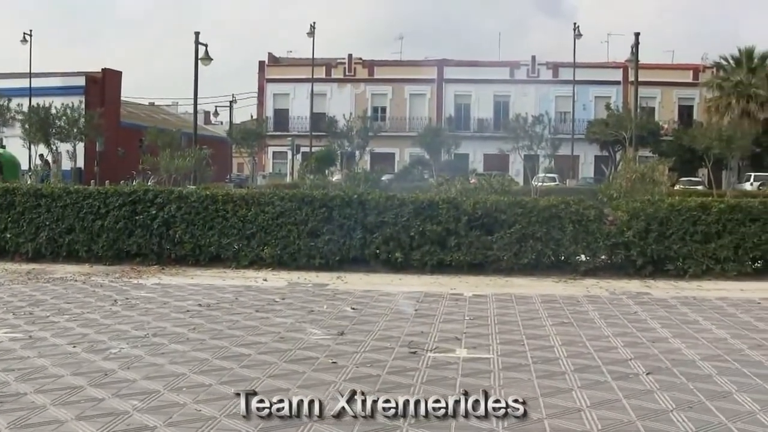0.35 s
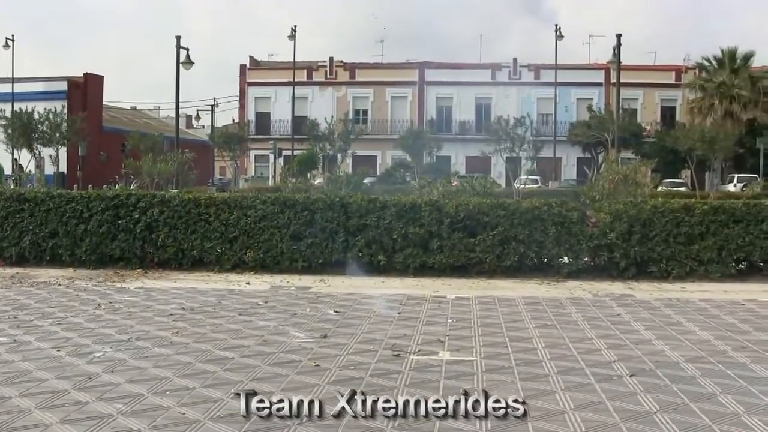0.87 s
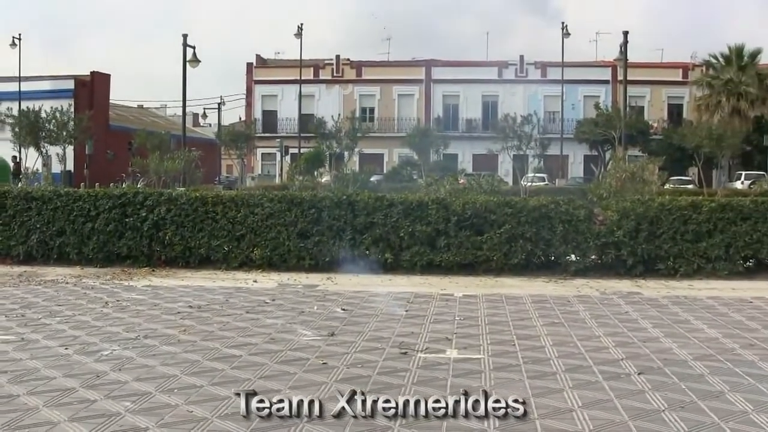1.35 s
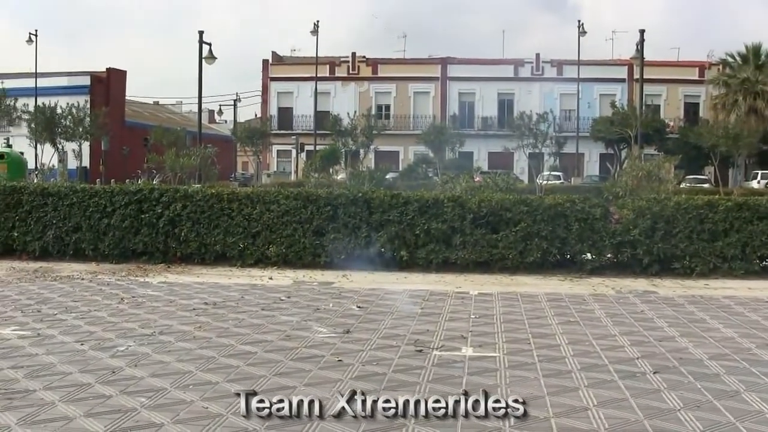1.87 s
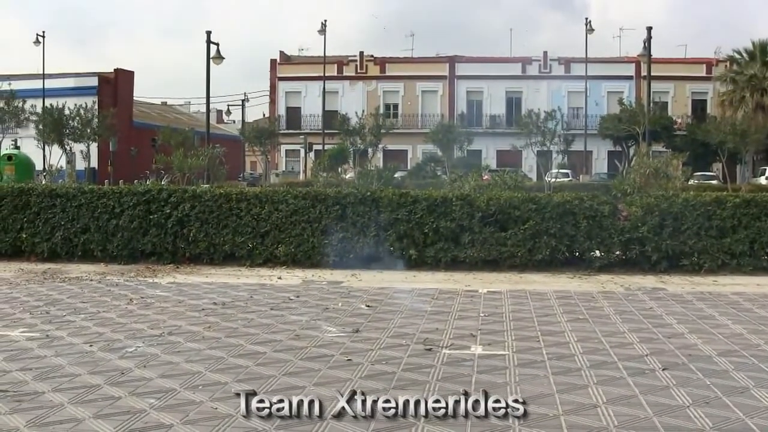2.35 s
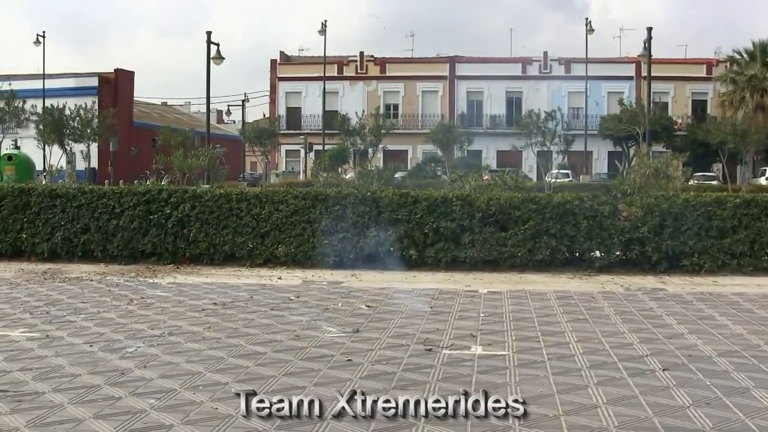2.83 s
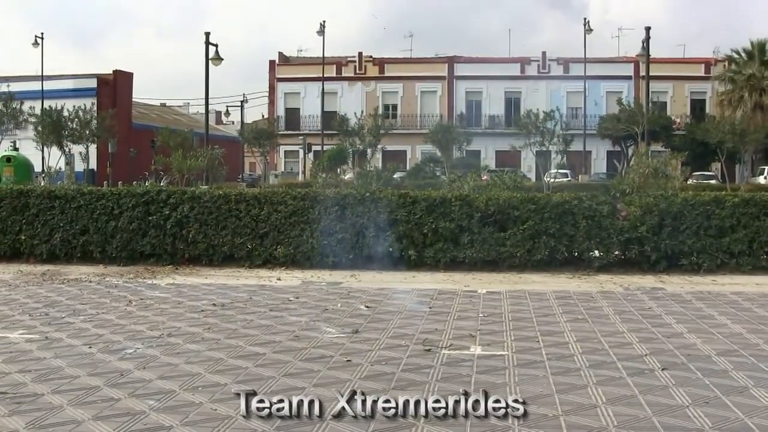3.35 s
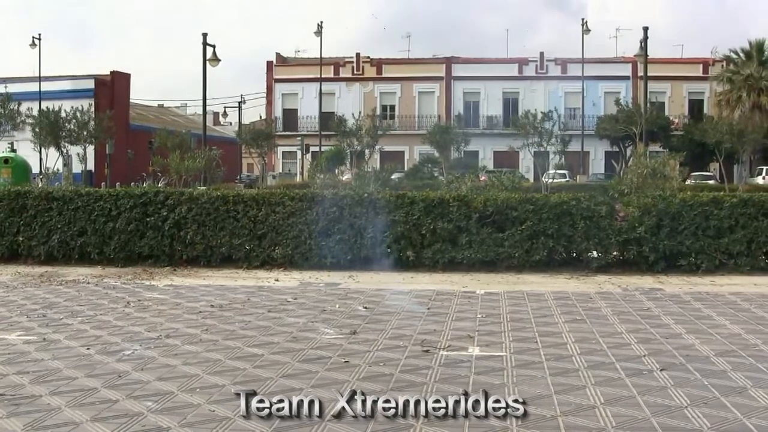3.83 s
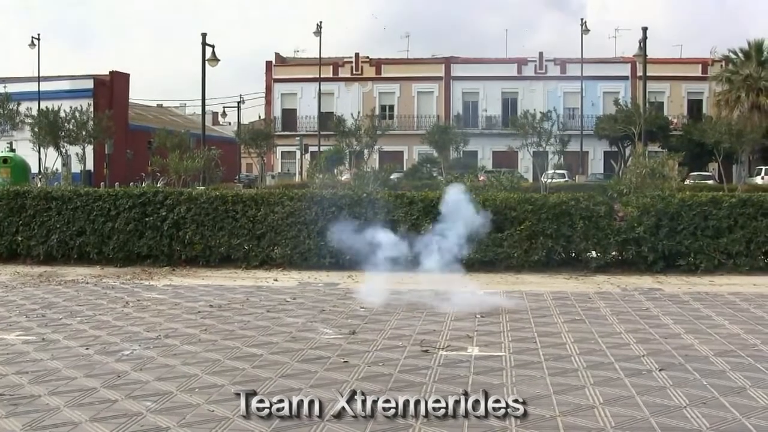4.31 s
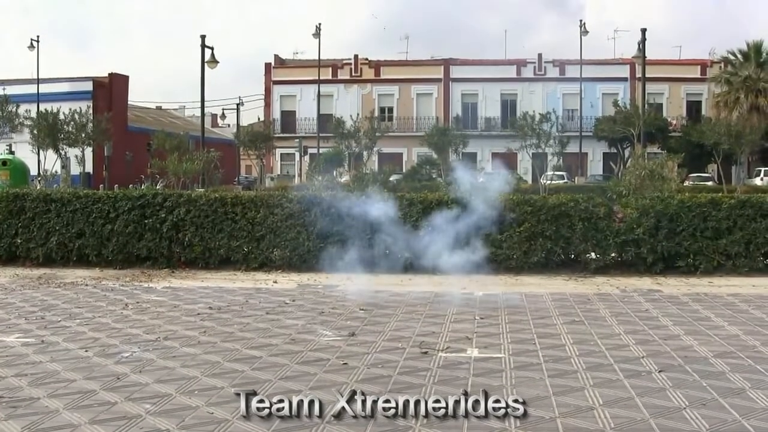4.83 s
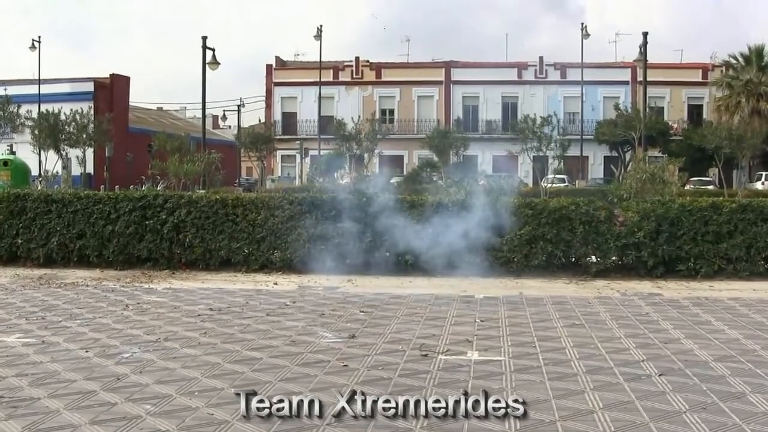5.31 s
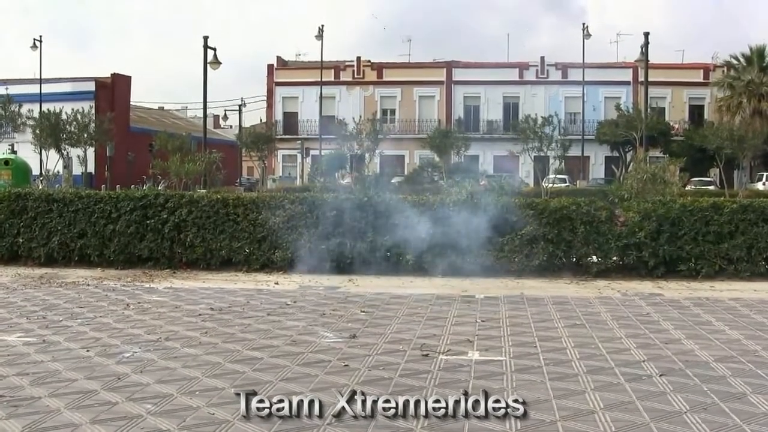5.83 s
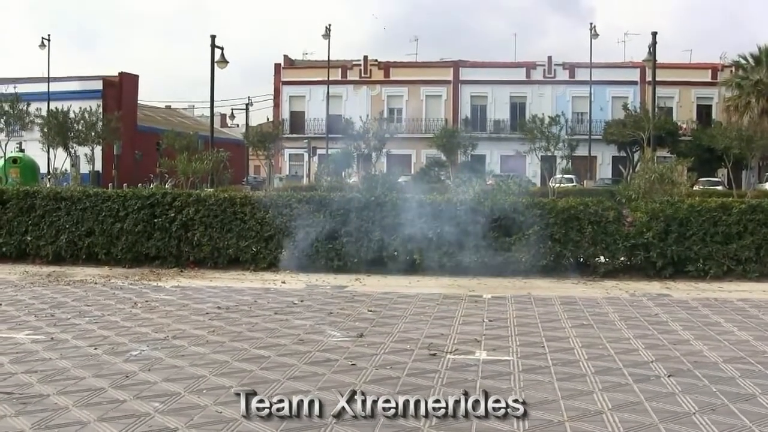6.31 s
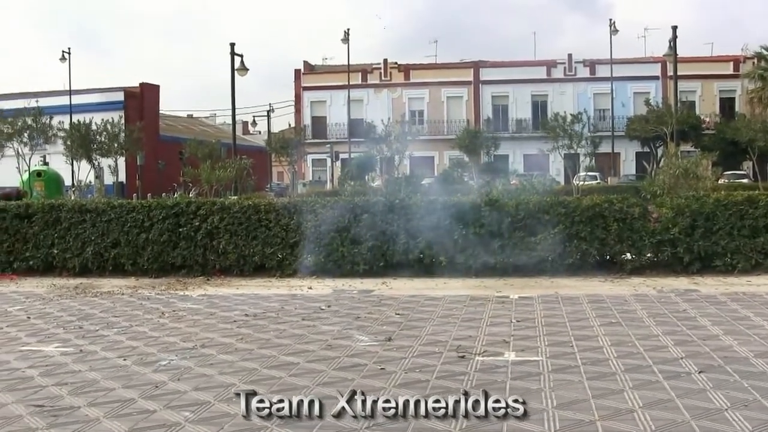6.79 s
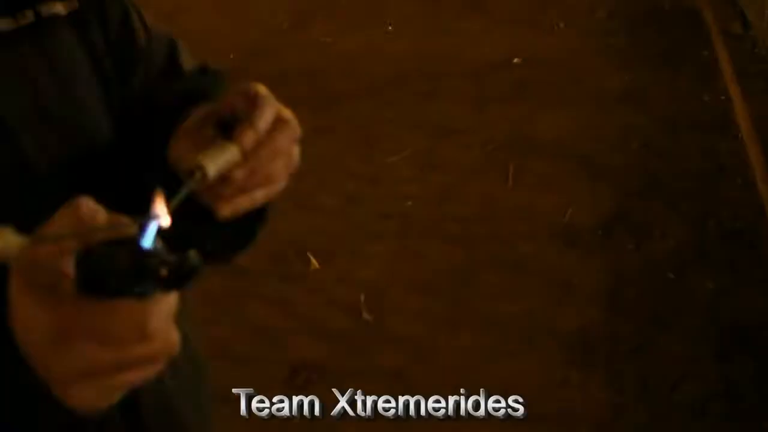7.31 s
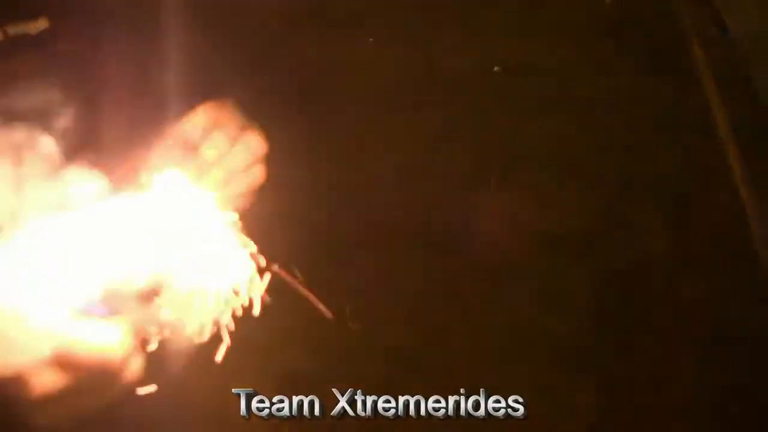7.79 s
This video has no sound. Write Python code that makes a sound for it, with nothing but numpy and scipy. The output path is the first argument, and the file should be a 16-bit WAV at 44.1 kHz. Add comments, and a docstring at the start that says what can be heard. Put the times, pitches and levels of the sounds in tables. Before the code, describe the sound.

A paved town square outdoors, with soft low traffic rumble, light wind and faint preamp hiss. From 0 s a fuse fizzes quietly, grainy and bright; at 0.15-0.3 s there are small wind thumps and a short high sparrow chirp. Farther firecrackers pop with dry snaps and short tails at about 1.9, 2.2 and 2.5 s, the first loudest. The fuse strengthens until 4.2 s, when a close, violent bang overloads the microphone. Hard slaps and booming, crackling echoes roll back unevenly from walls, pumping in level until about 5.3 s, losing treble and fading by 6.4 s. Dry debris ticks scatter through 5-7 s. More distant pops cluster at 6.05-6.3 s, with wind buffeting to 7 s, and one pop at 7.3 s. At 7.4 s a hard cut: a close flame starts, drops out for an instant, then roars with fluttering low rush and rapidly rising hiss to the end.

```python
"""A paved square: a firecracker's fuse fizzes, it bangs, and the echoes roll back from the house fronts.
Farther crackers pop, a sparrow chirps, debris ticks, the town rumbles in light wind and a preamp hisses.
A hard cut then jumps to a close flame, which plays an instant, drops out and starts again.
Blasts and thumps are pressure waves, chirps are gliding sines; fuse, echoes, flame and town are coloured noise."""
import sys
import numpy as np
from scipy import signal
from scipy.fft import rfft, irfft, next_fast_len
from scipy.io import wavfile
from scipy.ndimage import uniform_filter1d, map_coordinates

SR = 44100
rng = np.random.default_rng(int(sys.argv[2]) if len(sys.argv) > 2 else 0)


def natural_amplitude(level_db):
    """Convert a level in decibels to a linear amplitude factor, elementwise."""
    exponent = np.asarray(level_db, float) / 20
    return 10 ** exponent


def persist_wave(psi):
    """Save psi, clipped to +-1, as 16-bit WAV."""
    counts = np.round(np.clip(psi, -1, 1) * 32767).astype(np.int16)
    wavfile.write(sys.argv[1], SR, np.atleast_2d(counts).T)


N = 349272
T = np.arange(N) / SR
BANG_S = 4.1999
CUT_S, STUTTER_S, RESTART_S = 7.4052, 7.4158, 7.4262


def unit(x):
    """Scales to rms 1."""
    return x / np.sqrt(np.mean(x ** 2) + 1e-20)


def curve(rows):
    """Joins (time_s, value) points into one value per sample."""
    time_s, value = np.transpose(rows)
    return np.interp(T, time_s, value)


def wobble(rate_hz):
    """A smooth random curve, rate_hz knots a second."""
    knots = rng.standard_normal(int(N * rate_hz / SR) + 4)
    return map_coordinates(knots, [T * rate_hz])


def along(spectrum, at_hz):
    """dB of (freq_hz, level_db) points joined on a log axis."""
    freq_hz, level_db = np.transpose(spectrum)
    return np.interp(np.log(at_hz + 1), np.log(freq_hz + 1), level_db)


def coloured(x, spectrum):
    """Filters x through a spectrum, at rms 1."""
    size = next_fast_len(len(x) + 8192)
    gain = natural_amplitude(along(spectrum, np.fft.rfftfreq(size, 1 / SR)))
    return unit(irfft(rfft(x, size) * gain, size)[:len(x)])


def rush(spectrum, patchy_db, grain_db=0):
    """Noise with slow patches of gain; grain makes some samples stand out as sparks or single echoes."""
    sparks = rng.standard_normal(N) * natural_amplitude(grain_db * np.minimum(rng.exponential(size=N), 6))
    z = signal.stft(sparks, nperseg=512)[2]
    field = uniform_filter1d(rng.standard_normal(z.shape), size=6, axis=0)
    field = uniform_filter1d(field, size=12, axis=1)
    patchy = signal.istft(z * natural_amplitude(patchy_db * unit(field)), nperseg=512)[1][:N]
    return coloured(patchy, spectrum)


def through_air(x, db_per_khz, growth, pivot_hz=0):
    """Tilts about a pivot, growing by dB/kHz each second: positive loses treble as air does, negative lifts it."""
    hz, t, z = signal.stft(x, SR, nperseg=256)
    loss_db = np.outer((hz - pivot_hz) / 1000, db_per_khz + growth * t)
    return signal.istft(z * natural_amplitude(-loss_db), SR, nperseg=256)[1][:len(x)]


def pressure_wave(crest_s, level_db, pitch_hz, cycles):
    """A crest with a short dip before it and a few swings after it."""
    turns = pitch_hz * (T - crest_s)
    width = np.where(turns < 0, .5, cycles)
    return natural_amplitude(level_db) * np.cos(2 * np.pi * turns) * np.exp(-(turns / width) ** 2)


def add(track, start_s, sound):
    """Mixes a sound in at start_s."""
    part = track[round(start_s * SR):][:len(sound)]
    part += sound[:len(part)]


# level drops after the hardest slaps, depth before the fall and recovery shape it: start_s, depth_db
LEVEL_DIPS = [(4.233, 10.5), (4.414, 4), (4.502, 8), (4.621, 4), (4.842, 14.5), (4.972, 12.5)]


def dips():
    """dB lost: each dip falls fast and heals slowly."""
    fall_s, recover_s = 0.011, 0.12
    lost_db = np.zeros(N)
    for start_s, depth_db in LEVEL_DIPS:
        t = np.maximum(T - start_s, 0)
        lost_db += depth_db * (1 - np.exp(-t / fall_s)) * np.exp(-t / recover_s)
    return lost_db


# direct wave, ground bounce, near hedge; level before the front rounds it: delay_s, level_db, push_ms
BLAST_FRONTS = [(0, 15, .85), (.0022, 9, .25), (.0026, 12, 1.25), (.0046, 6, .9), (.0082, 0, 1.4),
                (.012, -5, .8), (.0293, -5, 1.1)]


def bang():
    """Steep fronts, each a push and a longer suction, later ones blunter; then the hedge scatters a bright hash."""
    out, t = np.zeros(N), T[:SR // 4]
    for delay_s, level_db, push_ms in BLAST_FRONTS:
        u = 1000 * t / push_ms
        front = 1 - np.exp(-t / (.00002 + delay_s / 60))
        add(out, BANG_S + delay_s, natural_amplitude(level_db) * front * (1 - u) * np.exp(-u * u / 2.7))
    scatter = (t / 0.0091) * np.exp(-(t / 0.013) ** 2)
    hash_spectrum = [(800, -12), (2500, -1.0), (5500, -4.5), (9000, -12.0), (16000, -23.5)]
    hash_noise = coloured(rng.standard_normal(len(t)), hash_spectrum)
    add(out, BANG_S + 0.0035, natural_amplitude(-6.5) * scatter * hash_noise)
    return out


# strength of the rolling echoes: time_s, level_db
ROLL_LEVEL = [(4.22, -13.5), (4.4, -15.5), (4.6, -8.5), (4.83, -11), (5.05, -7.5), (5.33, -14),
              (5.5, -22.5), (5.8, -27), (6.04, -33), (6.4, -42)]
# echo colours, low to high: freq_hz, relative_db_per_hz
BOOM_SPECTRUM = [(18, -68), (30, -41), (49, -35), (103, -9), (172, 1.5), (267, 3), (380, -1), (581, -6),
                 (724, -17), (1000, -22), (1300, -59), (2200, -120)]
CRACKLE_SPECTRUM = [(300, -39), (600, -4), (1000, -3), (1500, -3), (3000, -13.5), (4500, -20.5),
                    (8000, -43), (16000, -87.5)]
SIZZLE_SPECTRUM = [(1500, -14), (3000, -5.5), (4200, -6.5), (6000, -7.5), (8000, -10.5), (11000, -18.5),
                   (16000, -30)]


def roll():
    """Countless walls answer; later echoes have crossed more air and lost their treble."""
    level_db, lost_db, age_s = curve(ROLL_LEVEL), dips(), T - BANG_S
    fade = np.clip(age_s / .02 - .2, 0, 1) * np.clip((6.6 - T) / .2, 0, 1)
    flutter_db = wobble(45)  # echoes arrive in bunches
    bright_db = level_db - 1.11 * lost_db  # brighter layers dip deeper
    boom_db = level_db - lost_db + 0.68 * flutter_db
    boom = natural_amplitude(boom_db) * rush(BOOM_SPECTRUM, patchy_db=1.4, grain_db=2.5)
    crackle_loss_db = 12.5 * (1 - np.exp(-np.abs(age_s) / 0.69))  # levels off
    crackle_db = bright_db - 3.5 - crackle_loss_db + 2.04 * flutter_db
    crackle = natural_amplitude(crackle_db) * rush(CRACKLE_SPECTRUM, patchy_db=0.3, grain_db=3.0)
    sizzle_loss_db_per_s = 31.5
    sizzle_db = bright_db - 3.5 - sizzle_loss_db_per_s * age_s + 0.52 * flutter_db
    sizzle = np.zeros(N)
    source = rush(SIZZLE_SPECTRUM, patchy_db=0.5, grain_db=2.5)[:3 * SR]
    add(sizzle, BANG_S, through_air(source, db_per_khz=0.05, growth=5.3, pivot_hz=4800))
    return fade * (boom + crackle + natural_amplitude(sizzle_db) * sizzle)


# low pushes, gusts on the microphone early on and wall echoes after the bang:
# crest_s, level_db, pitch_hz, decay_cycles
PUSHES = [(0.153, -23.5, 150, 1.1), (0.169, -26, 104, 1.9), (0.305, -20, 136, 0.98),
          (4.3932, -2.5, 335, 0.79), (4.4122, -4, 415, 0.81), (4.48, -3.5, 332, 0.61),
          (4.496, -6, 335, 1.5), (4.5, 1.5, 302, 0.25), (4.544, -7, 520, 0.5), (4.8356, -1, 312, 0.78),
          (4.9584, -0.5, 304, 0.6), (4.968, 0, 322, 0.57)]


def thumps():
    """Each push is one bare pressure wave."""
    return sum(pressure_wave(*row) for row in PUSHES)


# how hard the fuse burns: time_s, fizz_db
BURN_LEVEL = [(0, -47), (.5, -47.5), (1.5, -44), (2.08, -42.5), (2.4, -45.5), (2.81, -42), (3.15, -44),
              (3.8, -42.5), (4.02, -38.5), (4.19, -38)]
# fuse colours: freq_hz, relative_db_per_hz
FIZZ_SPECTRUM = [(1000, -19), (1800, -0.5), (2500, -2.5), (3600, -1.5), (4600, -5.5), (6000, -20),
                 (9000, -60)]
SPIT_SPECTRUM = [(3500, -34), (5200, 0), (6400, 0), (7200, -7.5), (8500, -10.5), (10500, -13.5),
                 (12500, -23), (16000, -36)]


def fuse():
    """The powder train fizzes and spits until the flash, as grainy noise."""
    fizz_db = curve(BURN_LEVEL)
    swing_db = 0.2 * (fizz_db - np.median(fizz_db[T < BANG_S]))  # spit swings wider
    spit_grows_db_per_s = 0.4  # the spit gains on the fizz as the fuse shortens
    spit_db = fizz_db - 8.5 + spit_grows_db_per_s * (T - BANG_S / 2) + swing_db
    flicker_db = 0.84 * wobble(6.5)
    fizz = natural_amplitude(fizz_db + flicker_db) * rush(FIZZ_SPECTRUM, patchy_db=1.1, grain_db=2.5)
    spit = natural_amplitude(spit_db + flicker_db) * rush(SPIT_SPECTRUM, patchy_db=1.3, grain_db=1.5)
    return (fizz + spit) * (T < BANG_S)


# close flame colours: freq_hz, relative_db_per_hz
ROAR_SPECTRUM = [(15, -62), (25, -38), (51, -14), (102, -13), (145, -0.5), (260, -2.5), (313, -7),
                 (600, -11), (780, -28), (1320, -120)]
JET_SPECTRUM = [(300, -39), (600, -2.5), (950, 3.5), (1400, -0.5), (2100, -3), (3000, -12), (4500, -14),
                (8000, -45)]
HISS_SPECTRUM = [(1760, -28), (3000, 2), (4540, -4.5), (5480, -2), (6710, -4), (7620, -10.5), (8700, -11.5),
                 (10200, -17.5), (11100, -16), (16000, -33)]


def flame():
    """Turbulent burning: a fluttering low roar, the jet of the flame and a hiss that rises and brightens."""
    flutter_db = wobble(27)
    roar = natural_amplitude(-14.5 + 0.84 * flutter_db) * rush(ROAR_SPECTRUM, patchy_db=0.6, grain_db=2.5)
    jet = natural_amplitude(-18.5 + .8 * flutter_db) * rush(JET_SPECTRUM, patchy_db=1.2, grain_db=2.0)
    hiss_rise_db_per_s = 22.5  # climbs as it flares
    hiss_db = -37.5 + hiss_rise_db_per_s * (T - RESTART_S) + 0.91 * wobble(18)
    hiss = np.zeros(N)
    source = rush(HISS_SPECTRUM, patchy_db=2.3, grain_db=1.0)[:SR]
    add(hiss, RESTART_S, through_air(source, db_per_khz=-.1, growth=-1, pivot_hz=6000))
    return roar + jet + natural_amplitude(hiss_db) * hiss


# farther crackers and their echoes; tail is relative to the pop, loss is that at its start:
# crest_s, level_db, pitch_hz, tail_db, treble_loss_db_per_khz
FAR_POPS = [(1.8627, -5, 850, -15.5, 0.9), (1.877, -20.5, 1500, -7.5, -0.9),
            (1.9078, -12.5, 1080, -14, 5.5), (1.9856, -20.5, 1500, -12, 1), (2.1648, -12, 1360, -12.5, 1.1),
            (2.2191, -15.5, 1610, -11.5, 1.7), (2.47, -16, 1800, -17.5, 1.5), (6.052, -9.5, 515, -16, 0.05),
            (6.135, -32.5, 1500, -10.5, -1.5), (6.155, -11.5, 1100, -12, 1.5), (6.2068, -17, 480, -17, 4.5),
            (6.255, -28.5, 900, -6.5, 2.5), (6.335, -31, 890, -12, -1), (7.3094, -6, 730, -20, 0.6)]
# colour of a pop's tail: freq_hz, relative_db_per_hz
TAIL_SPECTRUM = [(88, -39), (150, -9), (484, 0.5), (624, -4.5), (905, -2), (1040, -2.5), (2810, -5),
                 (7040, -20), (16000, -63.5)]


def pops():
    """A sharp crest with a dry snap, its duller ground bounce, then a grainy tail that swells in and dulls."""
    near_t60_s, far_t60_s, far_db = 0.18, 2.6, -12.5  # near tail; slower answer of the far streets
    snap_spectrum = [(500, -21), (1500, 6), (3000, -8.5), (4500, -7), (9000, -37.5)]
    out, t = np.zeros(N), T[:SR]
    decay = natural_amplitude(-60 * t / near_t60_s) + natural_amplitude(far_db - 60 * t / far_t60_s)
    swell = 1 - np.exp(-t / 0.00061)
    for crest_s, level_db, pitch_hz, tail_db, loss_db in FAR_POPS:
        grains = rng.standard_normal(len(t)) * natural_amplitude(2.9 * np.minimum(rng.exponential(size=len(t)), 5))
        tail = through_air(coloured(grains, TAIL_SPECTRUM), loss_db, growth=1.8) * decay
        snap = natural_amplitude(-17 - 60 * t / 0.015) * coloured(grains, snap_spectrum)
        add(out, crest_s, natural_amplitude(level_db) * (snap + natural_amplitude(tail_db) * tail) * swell)
        out += pressure_wave(crest_s, level_db, pitch_hz, .65)
        out += pressure_wave(crest_s + .0029, level_db - 9, .4 * pitch_hz, .8)  # ground bounce
    return out


# sparrow notes: start_s, length_s, start_hz, end_hz, level_db
CHIRP_NOTES = [(0.227, 0.018, 6100, 5750, -37), (0.238, 0.013, 6000, 4540, -34.5),
               (0.294, .014, 5100, 6940, -41), (.309, 0.018, 6300, 6250, -39), (.31, .015, 5200, 5230, -40)]


def sparrow():
    """Short gliding whistles, slightly rough, with a weak octave."""
    out = np.zeros(N)
    for start_s, length_s, start_hz, end_hz, level_db in CHIRP_NOTES:
        t = T[:round(length_s * SR)]
        pitch_hz = start_hz + (end_hz - start_hz) * t / length_s
        phase = 2 * np.pi * np.cumsum(pitch_hz) / SR
        phase += np.cumsum(uniform_filter1d(rng.normal(0, .2, len(t)), size=12))  # roughness
        whistle = np.sin(phase) + 0.069 * np.sin(2 * phase)
        add(out, start_s, natural_amplitude(level_db) * np.sin(np.pi * t / length_s) * whistle)
    return out


# short dry ticks, falling debris and sharp little echoes: start_s, level_db, pitch_hz, width_octaves, t60_s
DRY_TICKS = [(.586, -32.5, 5000, .86, .014), (4.4093, -10, 2500, 1.05, .014),
             (4.455, -16.5, 2500, 1.2, .07), (4.477, -14.5, 3000, 1.48, 0.086),
             (4.4933, -9, 1400, 1.5, 0.046), (4.541, -14.5, 1200, 1.2, 0.027),
             (4.941, -35, 4500, .76, .025), (5.145, -31, 4500, 0.78, .03), (5.218, -24, 4000, 0.86, .02),
             (5.23, -28, 6000, 0.68, .015), (5.365, -26, 3000, 1.1, 0.016), (5.441, -25, 3500, 0.62, .014),
             (5.464, -25.5, 2000, 1.2, 0.031), (5.907, -29, 1810, 1.1, 0.037),
             (6.716, -41.5, 8900, 0.93, 0.043), (6.721, -45, 14000, .15, .06), (6.778, -39, 5000, .25, .02),
             (6.954, -50, 6000, 1.1, 0.064), (7.234, -42, 5200, .2, .015)]


def ticks():
    """Brief scratchy clicks: decaying noise around one pitch."""
    out, t = np.zeros(N), T[:SR // 12]
    for start_s, level_db, pitch_hz, octaves, t60_s in DRY_TICKS:
        spectrum = [(pitch_hz / 8 ** octaves, -70), (pitch_hz / 2 ** octaves, -9), (pitch_hz, 0),
                    (pitch_hz * 2 ** octaves, -16), (pitch_hz * 4 ** octaves, -60)]
        grit = coloured(rng.standard_normal(len(t)), spectrum)
        add(out, start_s, natural_amplitude(level_db - 60 * t / t60_s) * (1 - np.exp(-t / 0.00045)) * grit)
    return out


# traffic swell: time_s, wash_db
TRAFFIC_LEVEL = [(0, -42.5), (.75, -45), (1.5, -42.5), (2.6, -41.5), (4.19, -42), (5.8, -42.5), (6.5, -43),
                 (7.4, -42.5)]
# gusts on the microphone: crest_s, over_breeze_db
WIND_GUSTS = [(.16, 17), (.5, 8), (4.17, 5), (5.85, 6), (6.186, 25.5), (6.5, 18), (6.77, 23), (7.0, 11),
              (7.4, 10)]
# rumble and wash of traffic, wind buffeting: freq_hz, relative_db_per_hz
RUMBLE_SPECTRUM = [(29, -53), (50, -18), (113, -2.5), (146, -3), (227, -3.5), (259, -5.5), (403, -12.5),
                   (700, -24), (910, -45.5), (1540, -120)]
WASH_SPECTRUM = [(240, -20.5), (400, -8.5), (700, -7.5), (1200, -10.5), (1600, -13.5), (2500, -21),
                 (4000, -25.5), (6000, -46), (9000, -48.5), (16000, -77)]
BUFFET_SPECTRUM = [(12, -27), (30, -11), (55, 6), (100, 1.5), (200, -42), (400, -120)]


def town():
    """Distant traffic, a lumpy rumble and a smooth wash, with light wind; it sinks away under the roll."""
    wash_db = curve(TRAFFIC_LEVEL)
    mean_db = wash_db.mean()
    rumble_db = mean_db + 7.5 + 0.44 * (wash_db - mean_db)  # takes a share of the swell
    wind_db = np.full(N, -52.0)
    rise_s, fall_s = 0.091, .12
    for crest_s, over_db in WIND_GUSTS:
        wind_db += over_db * np.exp(-((T - crest_s) / np.where(T < crest_s, rise_s, fall_s)) ** 2)
    rumble = natural_amplitude(rumble_db + 1.3 * wobble(9)) * rush(RUMBLE_SPECTRUM, patchy_db=1.34)
    wash = natural_amplitude(wash_db + 0.69 * wobble(9.1)) * rush(WASH_SPECTRUM, patchy_db=0.55)
    wind = natural_amplitude(wind_db + 2.3 * wobble(5)) * rush(BUFFET_SPECTRUM, patchy_db=3.5)
    return natural_amplitude(-1.6 * dips()) * (rumble + wash + wind)  # sinks deeper than the roll


# colour of the preamp hiss: freq_hz, relative_db_per_hz
PREAMP_SPECTRUM = [(1500, -23), (3000, -6), (5000, -0.5), (8000, -4), (12000, -13), (16000, -16)]


def preamp_hiss():
    """Faint, nearly steady self-noise of the preamp; it dips less than the roll."""
    level_db = -59.0 + .8 * wobble(2.81) - .9 * dips()
    return natural_amplitude(level_db) * rush(PREAMP_SPECTRUM, patchy_db=2.5)


def after(start_s):
    """A 0.6 ms ramp from 0 to 1."""
    return np.clip((T - start_s) / .0006, 0, 1)


def scene():
    """The square, then the cut: the flame's first instant plays, drops out and starts again."""
    square = bang() + roll() + thumps() + fuse() + pops() + sparrow() + ticks() + town() + preamp_hiss()
    close = flame()
    early = np.roll(close, round((CUT_S - RESTART_S) * SR))
    first_instant = early * (after(CUT_S) - after(STUTTER_S))
    return (square * (1 - after(CUT_S)) + first_instant + close * after(RESTART_S))[None]


def band_limit(x):
    """A steep low-pass at the top of the band."""
    return signal.sosfilt(signal.butter(12, 15780, fs=SR, output="sos"), x)


def record(dry):
    """The input stage clips the bang; a coupling capacitor lets flat tops droop."""
    clipped = dry / (1 + np.abs(dry / 1.02) ** 12) ** (1 / 12)
    coupled = signal.lfilter(*signal.butter(2, 55, "high", fs=SR), clipped)
    return band_limit(np.clip(coupled, -1, 1))


dry = scene()
out = record(dry)
persist_wave(out)
```